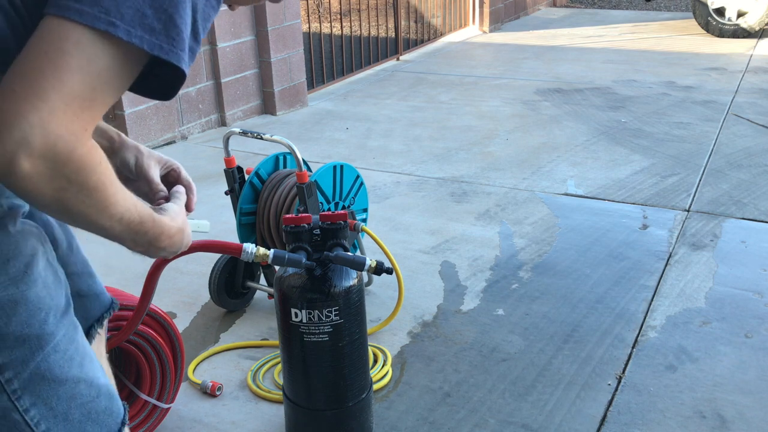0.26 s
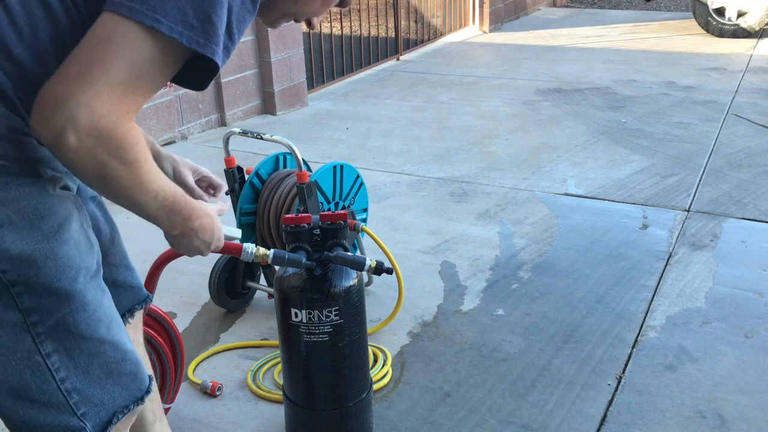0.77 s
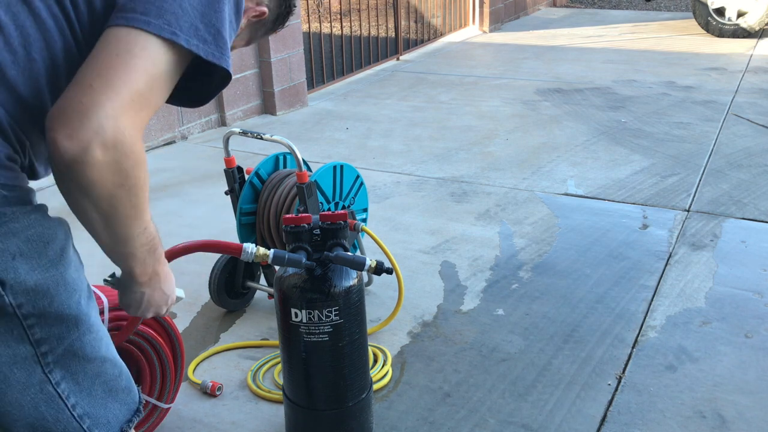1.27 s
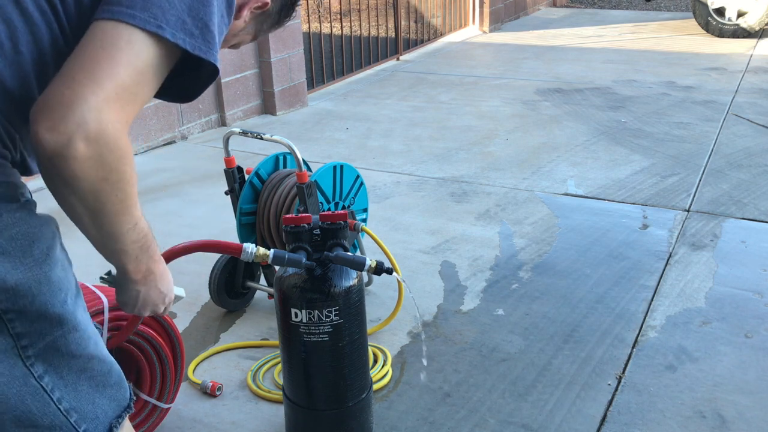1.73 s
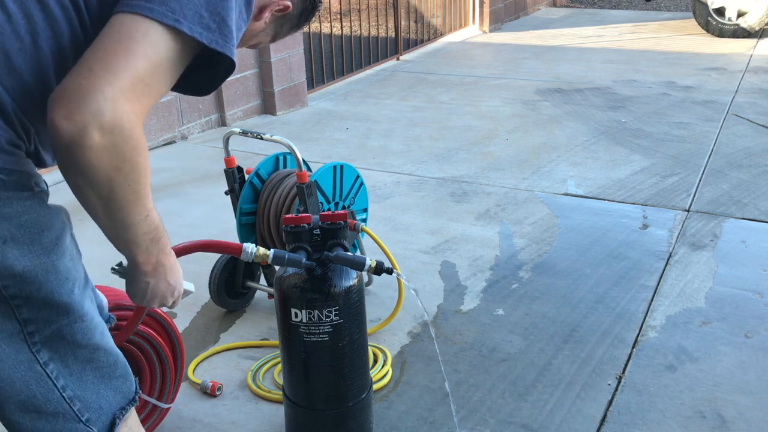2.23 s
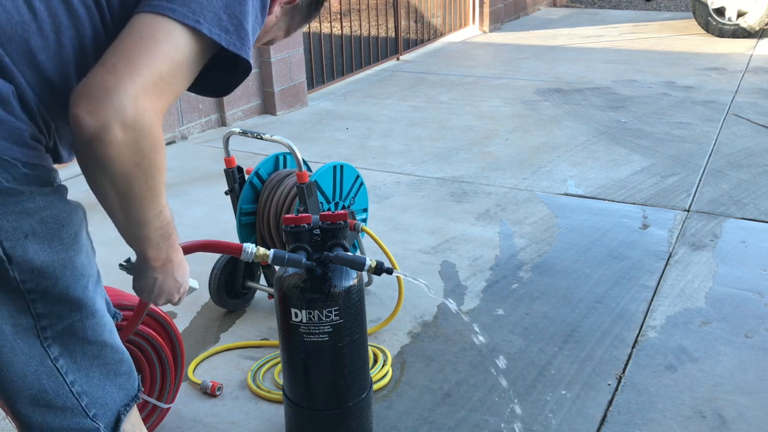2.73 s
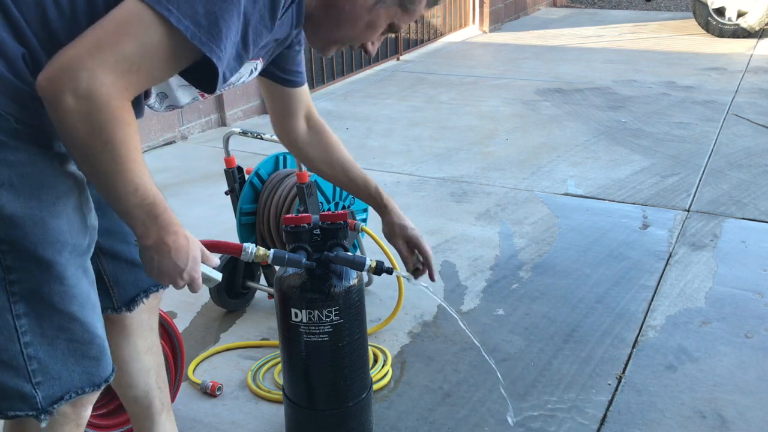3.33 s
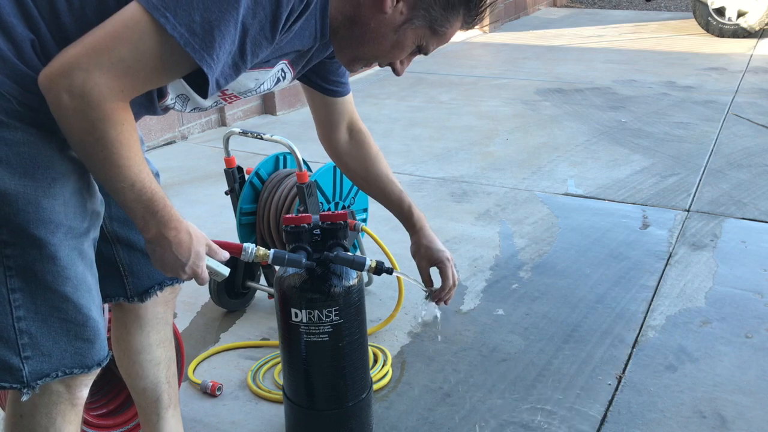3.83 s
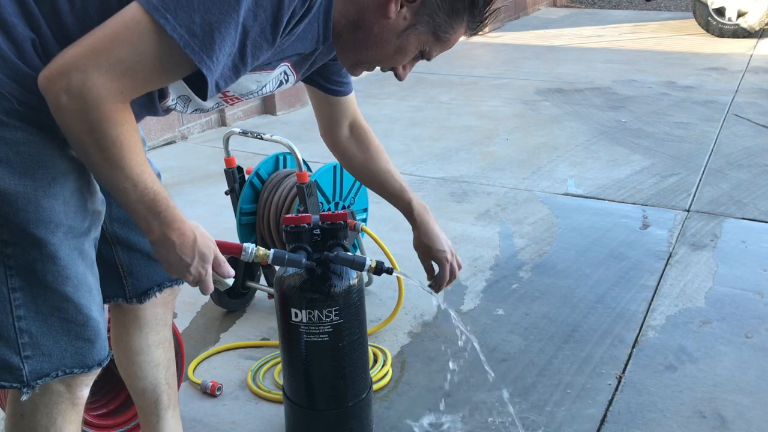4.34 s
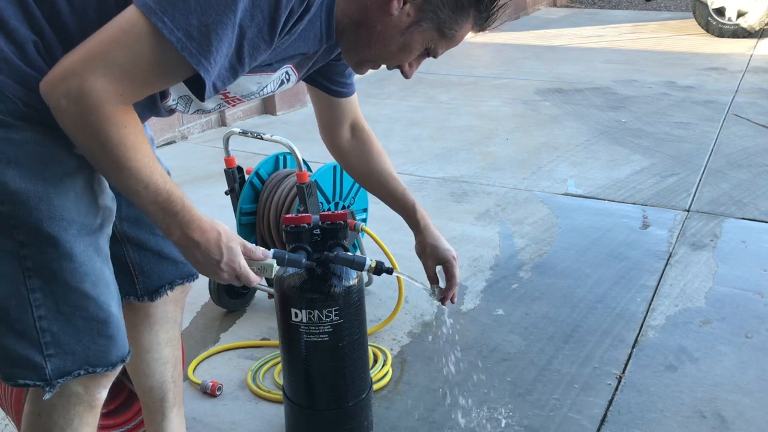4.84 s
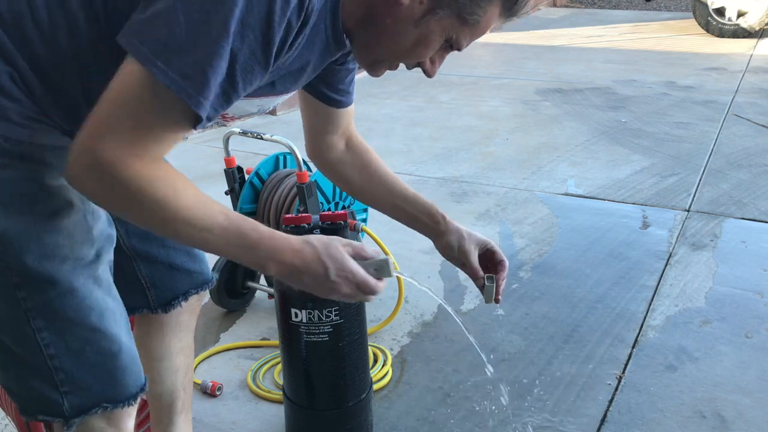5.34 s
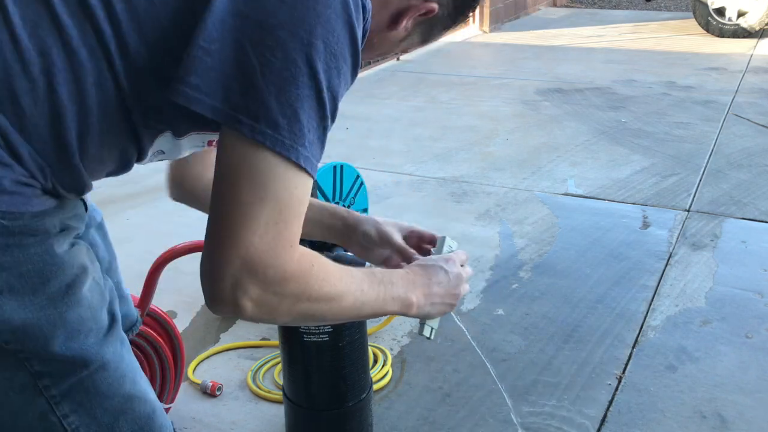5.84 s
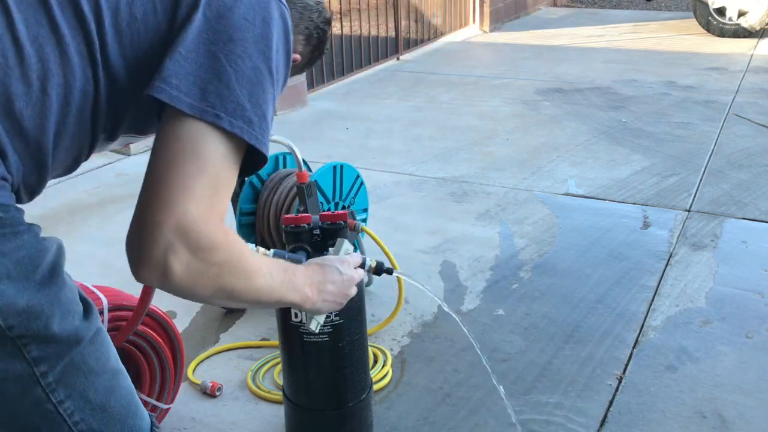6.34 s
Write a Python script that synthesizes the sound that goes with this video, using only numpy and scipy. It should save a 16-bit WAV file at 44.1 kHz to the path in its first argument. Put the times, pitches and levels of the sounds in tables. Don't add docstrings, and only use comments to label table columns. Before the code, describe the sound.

Outdoors on a concrete driveway, close to a small water tank, with soft low tyre rumble far away and a slight wall reflection. From 0 to 0.6 s hands fumble at a fitting: tiny clicks, dull scuffs and a couple of faint drips. Around 0.8-0.96 s skin rubs briefly on rubber hose, then it is almost quiet apart from stray ticks. Near 2 s the valve opens with a thin high hiss and faint whistling. At 2.4-3 s the first gush hits hardest, a dense crackle of bright slaps and quick upward bubble plinks. From 3 to 4 s drops are sparser, with an isolated sharp snap at 3.55. Busy patter and small gurgles return at 4.1-4.9 s, with a bright splash burst near 5.2. Afterwards scattered drips continue, sharp plinks at 6.1 and 6.4 s, hiss easing while a distant engine quietly climbs until 6.6 s.

```python
import sys
import numpy as np
from scipy import signal
from scipy.fft import rfft, irfft, next_fast_len
from scipy.io import wavfile

SR = 44100
rng = np.random.default_rng(int(sys.argv[2]) if len(sys.argv) > 2 else 0)


def pcm_store(signal):
    levels = np.round(np.clip(np.atleast_2d(signal), -1, 1) * 32767)
    wavfile.write(sys.argv[1], SR, levels.astype(np.int16).T)


def how_loud(loudness_db):
    steps = np.asarray(loudness_db, float) / 20
    return 10 ** steps


N = 290839

# (time [s], level [dB])
JET = [
    (0, -63.5),
    (1.9, -68),
    (2.35, -61.5),
    (2.6, -79),
    (3.25, -60.5),
    (3.4, -53),
    (4.1, -55),
    (5.6, -55),
    (6.1, -66.5),
    (6.59, -60),
]
# (time [s], peak level [dB], pitch [Hz], half length [ms])
BUBBLES = [(2.505, -16.5, 3017, 1.152), (2.5613, -15.5, 3330, .55), (2.611, -23, 3230, 0.75),
           (2.6413, -19, 5100, 0.17), (2.679, -17.5, 3570, .48), (2.709, -26, 3520, 0.69),
           (2.7402, -18, 2900, 0.7), (2.8121, -24.5, 3310, 0.65), (3.0003, -25.5, 2720, .69),
           (3.0338, -26.5, 3570, 0.35), (3.176, -20, 4850, 0.21), (3.3562, -27, 4550, 0.18),
           (3.3793, -22.5, 5950, .28), (3.7801, -25.5, 5200, 0.36), (3.8347, -29.5, 5150, 0.22),
           (4.3271, -26.5, 3740, 0.71), (4.3612, -29.5, 5060, 0.76), (4.4272, -26.5, 6540, .33),
           (4.479, -23, 3650, .48), (4.581, -23.5, 3840, 0.95), (4.973, -28, 4100, 0.28),
           (5.0286, -25, 3560, 0.4), (5.1628, -26, 4440, 0.5), (5.2214, -25.5, 2870, 0.36),
           (5.234, -27, 3170, .61), (6.07, -16, 4980, 0.49), (6.4012, -23.5, 4780, 0.48)]
# (time [s], peak level [dB], pitch [Hz])
SMALL_BUBBLES = [(0.065, -36, 3850), (0.209, -36, 5730), (1.06, -41.5, 7350), (3.0422, -34, 3800),
                 (3.1117, -36.5, 5960), (3.147, -37, 3600), (3.6587, -30.5, 4070), (3.7477, -38.5, 5300),
                 (3.771, -40, 5000), (4.1261, -41.5, 4860), (4.306, -41, 5450), (4.3936, -32.5, 3190),
                 (4.456, -33.5, 4350), (4.5051, -30.5, 3700), (4.518, -38, 3580), (4.5313, -33, 4870),
                 (4.547, -41, 4400), (4.6044, -31, 3870), (4.6382, -36, 5600), (4.686, -33.5, 6250),
                 (4.863, -41, 3000), (3.0815, -43, 3970), (5.2801, -28, 3980), (5.308, -35, 5000),
                 (5.4734, -37.5, 4260), (5.601, -41, 6860), (5.6371, -32.5, 4110), (5.7869, -34.5, 6940),
                 (6.493, -43.5, 5500), (6.5681, -35, 5970)]
# (time [s], peak level [dB], first pitch [Hz], last pitch [Hz], length [ms])
POPS = [
    (2.5009, -25, 1530, 1790, 3.1),
    (2.8779, -30.5, 1840, 3970, 5.9),
    (2.9582, -29.5, 1310, 3340, 6.8),
    (4.2638, -30, 2650, 5530, 3.8),
    (4.574, -44, 910, 1510, 6),
    (5.1594, -39.5, 1970, 5220, 5.83),
    (5.203, -36.5, 2600, 4630, 5.7),
    (5.225, -37.5, 2370, 3770, 4),
]


def in_time(rows):
    s, *columns = np.transpose(rows)
    return [np.interp(np.arange(N) / SR, s, c) for c in columns]


def rms_one(x):
    return x / np.sqrt(np.mean(x ** 2) + 1e-20)


def coloured(x, spectrum):
    hz, level_db = np.transpose(spectrum)
    size = next_fast_len(N)
    bins = np.maximum(np.arange(size // 2 + 1) * SR / size, 1)
    gain = how_loud(np.interp(np.log(bins), np.log(hz), level_db))
    return rms_one(irfft(rfft(x, size) * gain, size)[:N])


def drift(rate):
    r = np.exp(-64 * np.pi * rate / SR)
    slow = signal.lfilter([1], [1, -2 * r, r * r], rng.standard_normal(N // 32 + 2002))[2000:]
    return np.interp(np.arange(N) / 32, np.arange(len(slow)), rms_one(slow))


def whistle(hz, width_hz):
    r = np.exp(-np.pi * width_hz / SR)
    a, b = signal.lfilter([1], [1, -r], rng.standard_normal((2, N)))
    phase = 2 * np.pi * np.cumsum(hz * np.ones(N)) / SR
    return rms_one(a * np.cos(phase) + b * np.sin(phase))


def tone(pitch):
    return np.sin(2 * np.pi * (rng.random() + np.cumsum(pitch) / SR))


def band_pass(x, low_hz, high_hz):
    edges = [low_hz, min(high_hz, .45 * SR)]
    return signal.sosfilt(signal.butter(2, edges, "band", fs=SR, output="sos"), x)


def add(out, sound, start):
    stop = min(N, start + len(sound))
    out[start:stop] += sound[:stop - start]


def traffic():
    # (frequency [Hz], level [dB per Hz])
    tyre_colour = [(12, -54), (20, -55), (48, -3.5), (86, 1), (103, -1), (134, -8), (247, -13), (392, -23),
                   (700, -43.5), (910, -34), (1540, -120)]
    # (time [s], firing rate [Hz], level [dB])
    engine_curve = [(0, 93.3, -61), (3.1, 92.16, -65), (3.45, 94.4, -48), (3.75, 94.5, -70),
                    (4.3, 92.5, -48.5), (4.7, 90.2, -60), (5.7, 84.74, -70), (5.9, 71.3, -53),
                    (6.2, 84.86, -51.5), (6.5, 100.2, -45), (6.59, 107, -51)]
    swell_db = 0.22 * np.arange(N) / SR
    tyres = how_loud(-56.5 + swell_db + 0.5 * drift(0.96)) * coloured(rng.standard_normal(N), tyre_colour)
    hz, level_db = in_time(engine_curve)
    turn = 2 * np.pi * np.cumsum(hz * (1 + 0.01836 * drift(2.39))) / SR
    engine = np.sin(turn) + how_loud(-13) * np.sin(2 * turn)
    return tyres + how_loud(level_db - 2.5 + 0.83 * drift(5.2)) * engine


def flow():
    # (time [s], level [dB])
    valve_curve = [
        (0, -69),
        (1.6, -79),
        (2.02, -57.5),
        (2.81, -55.5),
        (3.41, -56.5),
        (4.26, -54.5),
        (5.6, -57),
        (6.59, -61),
    ]
    # (frequency [Hz], width [Hz], level [dB])
    high_whistles = [(1860, 10, -10), (2870, 68, -2), (3450, 22, -11), (5280, 48, -1), (8350, 160, -0.5),
                     (8660, 67, -8), (9200, 210, -6), (9690, 180, 2), (10960, 190, -0.5), (13700, 370, -2)]
    # (frequency [Hz], level [dB per Hz])
    hiss_colour = [(290, -21), (500, 1), (2100, -4), (3490, -2), (4210, 7.5), (4940, -10.5), (6610, 5.5),
                   (8830, -27.5), (13100, -0.5), (16000, 0.5)]
    full_flow_db, broad_db = -59, -67
    valve_db, = in_time(valve_curve)
    out = how_loud(broad_db + 7.5 + 0.5 * drift(46)) * coloured(rng.standard_normal(N), hiss_colour)
    low_hz = 4206 + 11 * (in_time(JET)[0] - JET[0][1])
    out += how_loud(valve_db - 9 + 2.8 * drift(27)) * whistle(low_hz + 40 * drift(2.2), 240)
    middle_db = -67.5 + 1.6 * (valve_db - full_flow_db)
    out += how_loud(middle_db + 2 * drift(1.2)) * whistle(6500 + 80 * drift(0.97), 600)
    for hz, width_hz, level_db in high_whistles:
        fading_db = 3.5 * drift(4)
        moving_hz = hz * (1 + 0.008 * drift(0.69))
        out += how_loud(broad_db - 7 + level_db + fading_db) * whistle(moving_hz, width_hz)
    return out


def jet():
    opens_s, rise_s = 1.63, 0.51
    t = np.arange(N) / SR
    first_db, = in_time(JET)
    first_hz = 7500 - 190 * np.abs(t - JET[5][0])
    out = how_loud(first_db - 4 + 2.9 * drift(4.4)) * whistle(first_hz, 570)
    since = t - opens_s
    still_shut = np.clip(1 - since / rise_s, 0, 1)
    open_db = -6.5 * still_shut - 0.66 * np.maximum(since, 0)
    waking = 1 - 0.081 * still_shut * (since > 0)
    lower = whistle(11600 * waking + 60 * drift(0.6), 200)
    out += how_loud(open_db - 62.5 + 1.6 * drift(5)) * lower
    upper_db = open_db - 63 - 1.6 * np.clip(since - 1, 0, 1) + 1.7 * drift(7)
    return out + how_loud(upper_db) * whistle(12700 * waking, 420)


def snaps():
    # (time [s], peak level [dB],
    # centre [Hz])
    close_snaps = [(0.049, -28, 14000), (.095, -46, 11000), (.105, -43, 8500), (.13, -41, 7000),
                   (.161, -48, 10000), (.26, -47, 7000), (.8275, -38, 6400), (0.843, -35, 4200),
                   (2.3025, -31, 14000), (2.374, -31, 13500), (2.398, -42, 14500), (2.4478, -27, 14900),
                   (2.474, -38, 13500), (2.491, -36, 13570), (2.545, -43, 13000), (2.6754, -29, 11000),
                   (2.767, -40, 12000), (2.7885, -35, 12500), (2.8283, -31, 2300), (2.879, -27, 13000),
                   (2.9388, -29, 14200), (3.1433, -37, 13000), (3.28, -32, 14500), (3.308, -27, 13500),
                   (3.4247, -29.5, 13500), (3.5495, -20, 12000), (3.5863, -31, 14000), (3.667, -33, 10000),
                   (3.696, -26, 10000), (3.716, -26, 14000), (4.1242, -30, 11000), (4.3226, -27, 11600),
                   (5.1505, -40, 5800), (5.2035, -37, 8970), (5.2573, -31, 4300), (5.2652, -28, 6000),
                   (5.3174, -27, 12000), (5.8437, -42, 12000), (6.4298, -34, 11000)]
    width_oct = 0.55
    out, pulse = np.zeros(N), np.r_[1., np.zeros(200)]
    for s, level_db, hz in close_snaps:
        click = band_pass(pulse, hz * 2 ** -width_oct, hz * 2 ** width_oct)
        add(out, how_loud(level_db) * click / np.abs(click).max(), round(s * SR))
    return out


def all_bubbles():
    # (time [s], peak level [dB], pitch [Hz])
    round_bubbles = [(2.641, -29, 1730), (2.646, -40, 2220), (2.7176, -34, 2210), (2.77, -42, 3500),
                     (2.79, -30.5, 3430), (2.832, -28.5, 3880), (2.9402, -32, 5500), (2.961, -24, 2900),
                     (3.333, -42, 4470), (3.42, -44, 6450), (3.677, -36, 4330), (3.827, -41, 3820),
                     (4.08, -35.5, 6060), (4.0977, -44, 3020), (4.111, -41, 5530), (4.193, -42, 2600),
                     (4.216, -54, 2600), (4.23, -51, 2400), (4.306, -54, 2900), (4.4653, -24.5, 2220),
                     (4.47, -31, 2300), (4.486, -36, 6500), (4.511, -31, 7500), (4.585, -39, 5500),
                     (4.6702, -33, 2970), (4.737, -43, 4230), (4.748, -45, 3200), (4.7637, -39.5, 3460),
                     (4.815, -53, 3160), (4.825, -47, 2600), (4.886, -40, 7500), (4.917, -40, 2600),
                     (4.938, -53, 2200), (5.04, -31, 5500), (5.176, -43, 4200), (5.231, -33, 5630),
                     (5.254, -23.5, 5920), (5.2615, -22.5, 4350), (5.267, -34, 4250), (5.2745, -31, 4450),
                     (5.651, -43, 6300), (5.756, -36, 6250), (5.888, -45, 5200), (5.973, -41, 9000),
                     (6.0097, -33.5, 4816), (6.0256, -28.5, 5870), (6.1238, -29, 3230),
                     (6.124, -22.5, 5820), (6.264, -41, 7890), (6.347, -46.5, 3200), (6.3696, -35.5, 5910),
                     (6.4316, -23.5, 5500), (6.444, -30.5, 6850), (6.514, -38, 10000)]
    small_cycles, round_cycles = 2.8, 1.2
    rows = [(*row, 0.491) for row in BUBBLES]
    rows += [(s, db, hz, 1000 * small_cycles / hz, 0.56) for s, db, hz in SMALL_BUBBLES]
    rows += [(s, db, hz, 1000 * round_cycles / hz, 0.17) for s, db, hz in round_bubbles]
    return rows


def bubbles():
    out = np.zeros(N)
    waver = 1 + 0.04 * drift(690)
    ragged = how_loud(2.8 * drift(960))
    for s, level_db, hz, half_ms, rise_oct in all_bubbles():
        step = half_ms * SR / 1000
        lead = int(4.5 * step)
        u = np.arange(-lead, int(3 * step)) / step
        here = np.minimum(round(s * SR) + np.arange(len(u)), N - 1)
        ceiling = np.where(u < 0, 3.2, 2.1)
        climb = 2 ** (rise_oct * ceiling * np.tanh(u / ceiling))
        pitch = np.minimum(hz * climb * waver[here], .45 * SR)
        growing = np.minimum(u - u[0], 1) / (1 + (u / 1.13) ** 2)
        bursting = np.exp(-.5 * (u / 0.9) ** 2)
        swell = np.where(u < 0, growing, bursting) * ragged[here]
        add(out, how_loud(level_db) * swell / np.max(swell) * tone(pitch), max(round(s * SR) - lead, 0))
    return signal.sosfilt(signal.butter(2, 900, "high", fs=SR, output="sos"), out)


def all_slaps():
    # (time [s], peak level [dB], centre [Hz])
    hard_slaps = [(.2077, -42.5, 7900), (2.4473, -32.5, 15100), (2.6404, -29, 12000),
                  (2.7382, -24.5, 15300), (2.9056, -35.5, 11310), (2.9377, -35, 13800),
                  (2.957, -32.5, 8400), (3.014, -31, 8200), (3.1752, -26, 13700), (3.3076, -38, 11740),
                  (3.5503, -28.5, 12000), (3.6735, -29, 9200), (3.696, -31, 8850), (4.0773, -35, 11000),
                  (4.1924, -32, 8580), (4.2687, -26, 12300), (4.3725, -33, 11100), (4.4267, -27.5, 14000),
                  (4.463, -31, 11700), (4.5012, -34.5, 13920), (4.5086, -30.5, 13400), (4.6009, -35, 14200),
                  (4.6683, -35.5, 10100), (5.137, -33, 9150), (5.221, -24, 14200), (5.2593, -23, 8200),
                  (5.2787, -26.5, 9180), (5.3172, -24.5, 14300), (6.1227, -30, 9430)]
    # (time [s], peak level [dB])
    stray_ticks = [(1.2183, -39), (1.4561, -43), (1.9091, -47), (2.4324, -38), (3.051, -42), (3.0649, -42),
                   (3.5733, -41), (3.8085, -34), (3.8427, -34.5), (3.8808, -39), (4.2268, -41),
                   (4.3018, -36), (4.8389, -37), (4.9581, -34), (5.0774, -38), (5.4452, -39), (5.4834, -34),
                   (5.5135, -33.5), (5.857, -42), (5.882, -38), (5.902, -34.5), (6.339, -42),
                   (6.3588, -40.5), (6.4911, -36)]
    contacts = [(s - 4.2 * ms / 1000, -31 + 0.38 * db) for s, db, _, ms, _ in all_bubbles()]
    ticks = [*stray_ticks, *contacts]
    size = rng.uniform(-0.85, 1, len(ticks))
    return [*hard_slaps] + [(s, db, 12500 * 2 ** (0.54 * k)) for (s, db), k in zip(ticks, size)]


def slaps(crack_ms, fizz_ms, fizz_db):
    out, ms = np.zeros(N), np.arange(400) / SR * 1000
    fade = np.exp(-ms / crack_ms) + how_loud(fizz_db) * np.exp(-ms / fizz_ms)
    for s, level_db, hz in all_slaps():
        noise = rng.standard_normal(len(ms))
        noise[0] = 1.05
        burst = band_pass(noise * fade, 0.39 * hz, 1.276 * hz)
        add(out, how_loud(level_db + 6) * burst / np.abs(burst).max(), round(s * SR + 25))
    return out


def slosh():
    decay_ms, centre_hz = 4.9, 2600
    after = np.zeros(N)
    for s, level_db, *_ in [*BUBBLES, *POPS, *SMALL_BUBBLES]:
        after[round(s * SR)] = how_loud(level_db - 24)
    wash = signal.lfilter([1], [1, -np.exp(-1000 / (decay_ms * SR))], after) * how_loud(4.8 * drift(200))
    return wash * rms_one(band_pass(rng.standard_normal(N), 0.53 * centre_hz, 1.97 * centre_hz))


def fumbles():
    # (time [s], peak level [dB], centre [Hz])
    scuffs = [
        (.094, -39.5, 1000),
        (.262, -48.5, 1300),
        (.455, -49, 1200),
        (0.586, -48.5, 1370),
        (1.271, -50.5, 1483),
    ]
    out, ms = np.zeros(N), np.arange(3000) / SR * 1000
    for s, level_db, hz in scuffs:
        decay_ms = 3.2 + 1000 * 17 / hz
        puff = rng.standard_normal(len(ms)) * np.exp(-ms / decay_ms)
        add(out, how_loud(level_db) * band_pass(puff, .5 * hz, 1.8 * hz), round(s * SR))
    return out


def rub():
    # (frequency [Hz], level [dB per Hz])
    rub_colour = [(400, -20), (800, -5), (1400, -1.5), (2200, -0.5), (3600, 2.5), (5000, -6), (6500, -4),
                  (16000, -20)]
    start_s, press_s, full_s, stop_s = 0.8, 0.82, 0.886, 0.96
    attack_s, release_s = 0.022, 0.0066
    t = np.arange(N) / SR
    pressure = np.clip((t - press_s) / (full_s - press_s), 0, 1)
    edges = np.clip((t - start_s) / attack_s, 0, 1) * np.exp(-np.maximum(t - stop_s, 0) / release_s)
    stroke = edges * how_loud(-59.75 + 7.5 * pressure + 2 * drift(150))
    return stroke * coloured(rng.standard_normal(N), rub_colour)


def spray_db(t):
    # (centre time [s], half length [s], level [dB])
    breakups = [
        (2.77, 0.36, -56.5),
        (3.773, 0.12, -64.5),
        (4.567, 0.4, -58.5),
        (4.293, 0.069, -62),
        (5.255, 0.12, -56),
        (5.943, 0.07, -59.5),
        (6.424, 0.066, -57.5),
    ]
    bed = how_loud(-69.5) ** 2
    bursts = sum(how_loud(db - 7.5 * ((t - s) / half) ** 2) ** 2 for s, half, db in breakups)
    return 10 * np.log10(bed + bursts)


def spray(per_s, spread_db):
    # (frequency [Hz], level [dB per Hz])
    patter_colour = [(500, -6.5), (1100, -3.5), (2500, -2), (5000, -6), (9000, -7), (16000, -6)]
    sizes = how_loud(spread_db * np.minimum(rng.exponential(1, N), 3.5)) * rng.choice([-1, 1], N)
    born = rng.random(N) < per_s * how_loud(4 * drift(15)) / SR
    t = np.arange(N) / SR
    gate = np.clip((t - 2.18) / 0.26, 0, 1)
    return gate * how_loud(spray_db(t) + 2) * coloured(sizes * born, patter_colour)


def pops():
    attack_ms = 0.53
    out = np.zeros(N)
    for s, level_db, first_hz, last_hz, ms in POPS:
        u = np.linspace(0, 1, int(ms * SR / 1000))
        swell = np.minimum(u * ms / attack_ms, 1) * how_loud(-u) * np.sqrt(1 - u ** 4)
        pitch = first_hz + (last_hz - first_hz) * u ** 1.18
        add(out, how_loud(level_db) * swell * tone(pitch), round(s * SR))
    high_pass = signal.butter(4, 840, "high", fs=SR, output="sos")
    return signal.sosfilt(high_pass, out * how_loud(2.8 * drift(700)))


def faint_gurgles(count):
    start_s, stop_s = 2.5, 5.9
    when, size, reach, strength = rng.random((count, 4)).T
    s = start_s + when * (stop_s - start_s)
    first_hz = 900 * 2 ** (1.19 * size)
    level_db = spray_db(s) + 8.7 * strength
    return list(zip(s, level_db, first_hz, first_hz * (1.5 + reach), 9000 / first_hz))


def gurgles():
    # (time [s], peak level [dB], last pitch [Hz], length [ms])
    puddle_bubbles = [(2.6944, -44, 1920, 11), (2.725, -40.5, 1460, 2.6), (2.7542, -43, 1870, 21),
                      (2.662, -47, 1500, 5), (2.896, -53, 2400, 6), (2.94, -66, 2700, 6),
                      (3.023, -45, 1900, 8.9), (3.071, -47, 2220, 11.4), (3.3357, -46.5, 2700, 15),
                      (3.3674, -49, 2610, 16), (3.456, -52.5, 2570, 13), (4.064, -54, 2160, 14),
                      (4.1505, -47.5, 2110, 16), (4.1775, -44, 1310, 3), (4.2464, -53, 2560, 9.5),
                      (4.2813, -43, 2110, 13), (4.3437, -49, 2600, 16), (4.4067, -50, 2600, 19),
                      (4.19, -51.5, 1800, 8.3), (4.317, -49, 1900, 5.2), (4.425, -54.5, 1050, 6),
                      (4.503, -64, 1100, 6.5), (4.909, -55, 2760, 8.5), (4.5428, -47, 2366, 7.1),
                      (4.658, -46.5, 1870, 8.7), (4.6973, -52, 2770, 19), (4.7084, -55, 1170, 16),
                      (4.778, -46, 2700, 12), (4.797, -45.5, 1900, 8.6), (4.8458, -52.5, 2000, 18),
                      (4.996, -48.5, 2930, 5.6), (5.1451, -45.5, 1270, 4.3), (5.1845, -46.5, 1430, 7.1)]
    # (time [s], peak level [dB], pitch [Hz])
    bloops = [(3.7511, -52, 2160), (3.7845, -45.5, 1970), (3.8485, -51, 2143), (3.622, -57, 2340),
              (3.885, -57, 1930), (4.083, -54, 2020), (4.168, -52, 2360), (4.4274, -50, 1861),
              (4.468, -57, 2470), (5.002, -56, 1660)]
    rows = [(s, db, 545 + 0.15 * hz, hz, ms) for s, db, hz, ms in puddle_bubbles]
    rows += [(s, db, 0.8 * hz, hz, 5.9) for s, db, hz in bloops]
    rows += faint_gurgles(count=120)
    out, waver = np.zeros(N), drift(75)
    for s, level_db, first_hz, last_hz, ms in rows:
        u = np.linspace(0, 1, int(ms * SR / 1000))
        shake = waver[min(round(s * SR), N - len(u)):][:len(u)]
        pitch = (last_hz + (first_hz - last_hz) * np.exp(-3 * u)) * (1 + 0.045 * shake)
        add(out, how_loud(level_db + 2.5) * np.sin(np.pi * u ** 0.41) * tone(pitch), round(s * SR))
    return out * how_loud(2.6 * drift(330))


def yard(x):
    # (delay [ms], level [dB])
    near_echoes = [(.9, -21), (2.1, -20.5), (3.4, -16.5), (5.9, -17), (7.6, -40), (12.5, -20.5),
                   (19.0, -43)]
    t = np.arange(int(.3 * SR)) / SR
    tail = rng.standard_normal(len(t)) * how_loud(-60 * t / 0.21) * np.clip(t / 0.00077, 0, 1)
    tail = signal.sosfilt(signal.butter(1, 16400, fs=SR, output="sos"), tail)
    answer = how_loud(-12) * tail / np.sqrt(np.sum(tail ** 2))
    answer[0] = 1
    for k, (ms, level_db) in enumerate(near_echoes):
        answer[round(ms * SR / 1000)] += how_loud(level_db) * (-1) ** k
    return signal.fftconvolve(x, answer)[:N]


def scene():
    drops = bubbles() + pops() + gurgles() + slaps(crack_ms=0.19, fizz_ms=3.7, fizz_db=-14.5)
    near = drops + spray(per_s=2300, spread_db=6) + rub() + fumbles() + slosh()
    diffuse = flow() + jet() + traffic()
    close = snaps()
    return (yard(near + how_loud(-8) * close) + close + diffuse)[None]


def band_limit(x):
    return signal.sosfilt(signal.butter(12, 17000, fs=SR, output="sos"), x)


def record(dry):
    mix = signal.sosfiltfilt(signal.cheby2(16, 70, 17000, fs=SR, output="sos"), dry)
    return band_limit(mix)


dry = scene()
out = record(dry)
pcm_store(out)
```